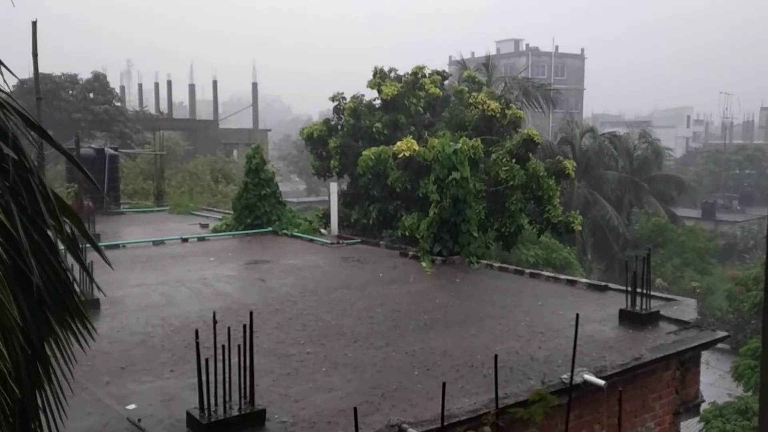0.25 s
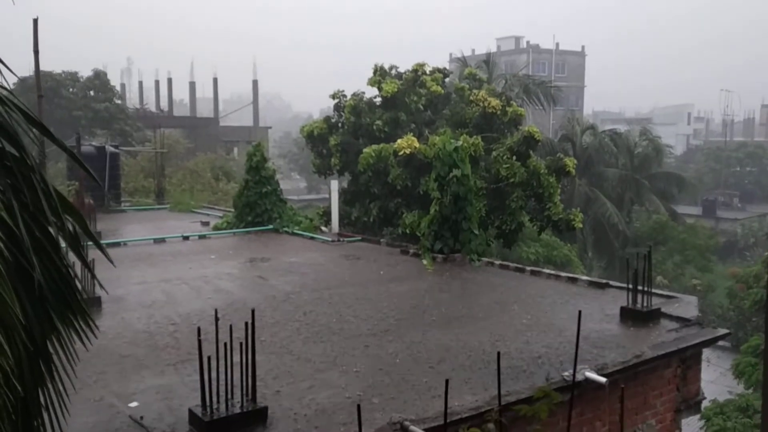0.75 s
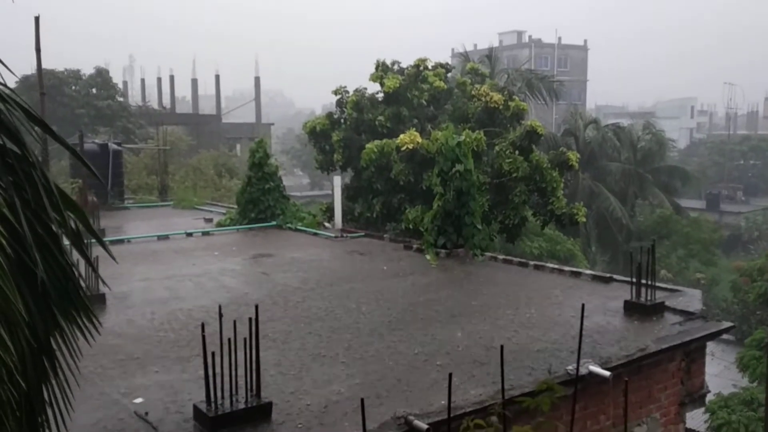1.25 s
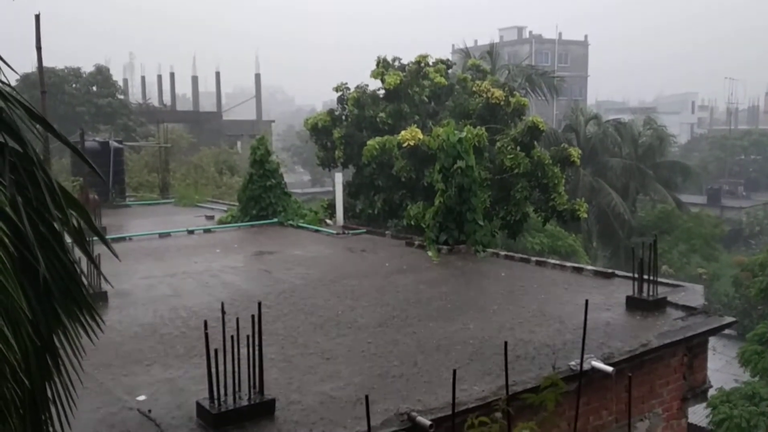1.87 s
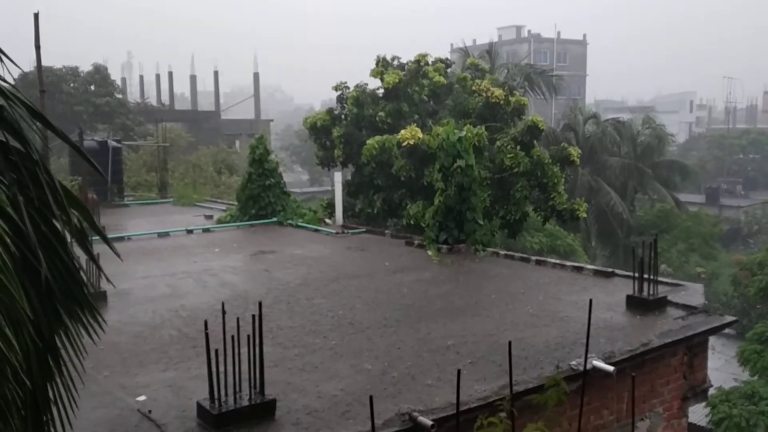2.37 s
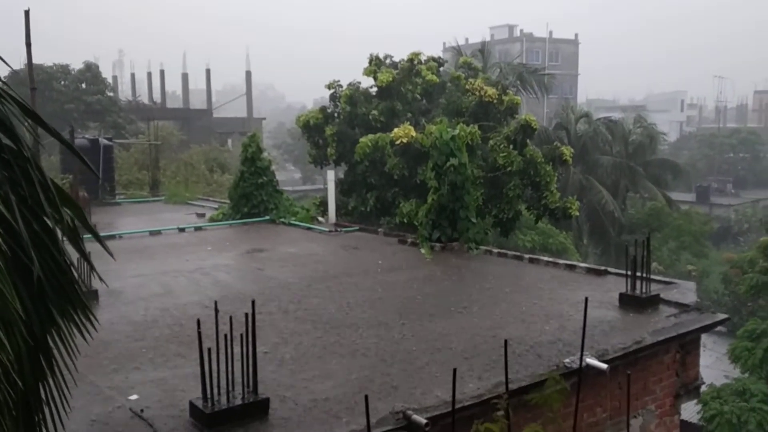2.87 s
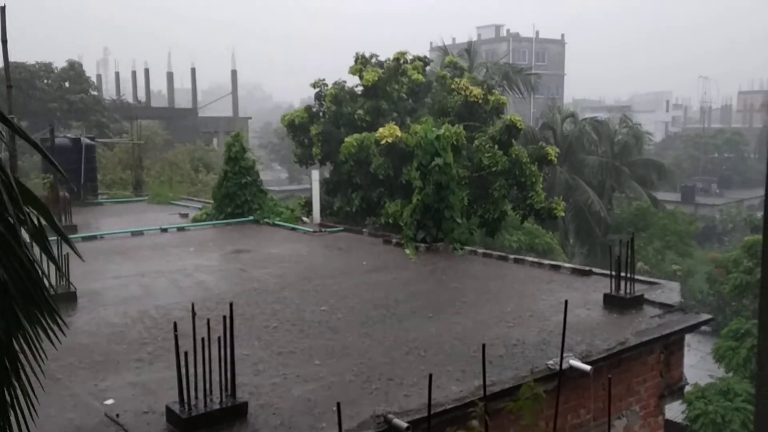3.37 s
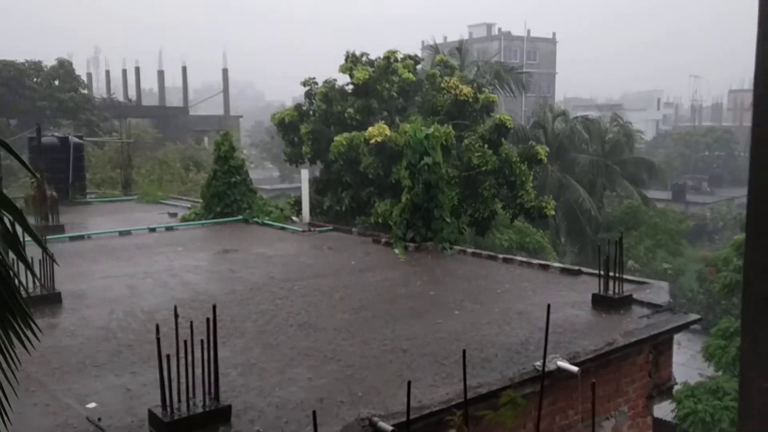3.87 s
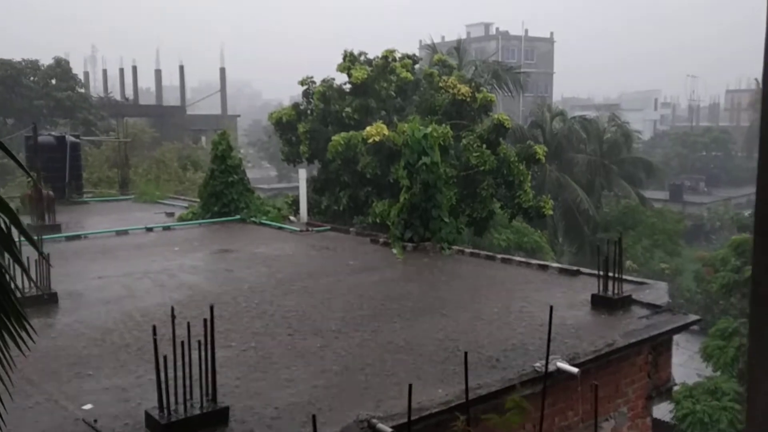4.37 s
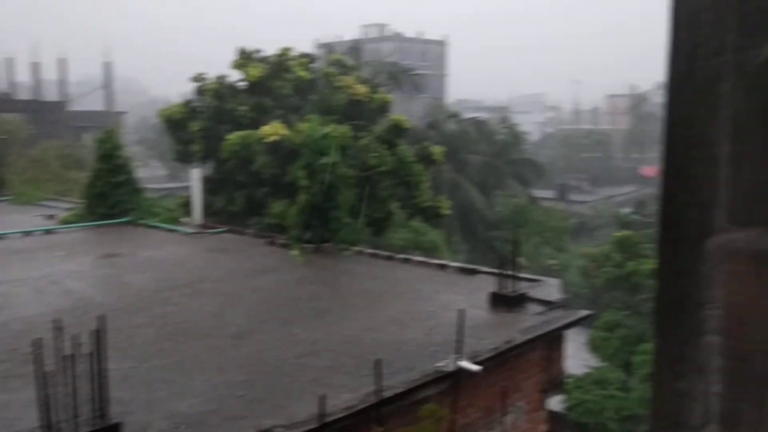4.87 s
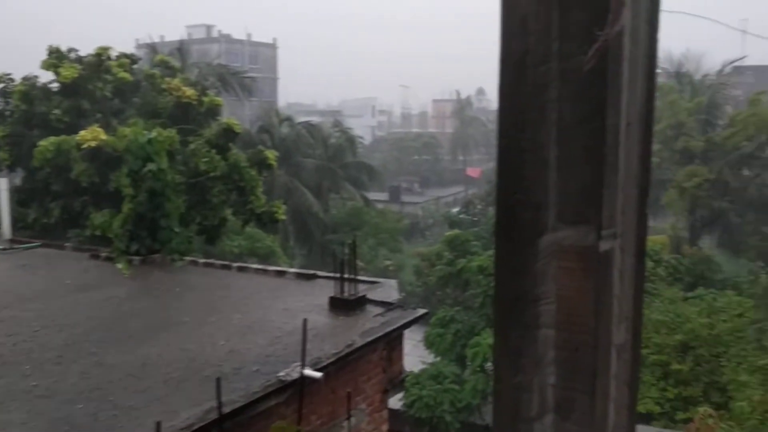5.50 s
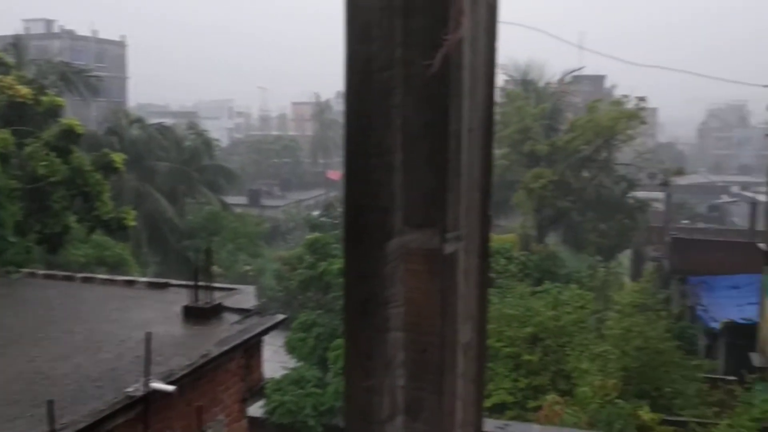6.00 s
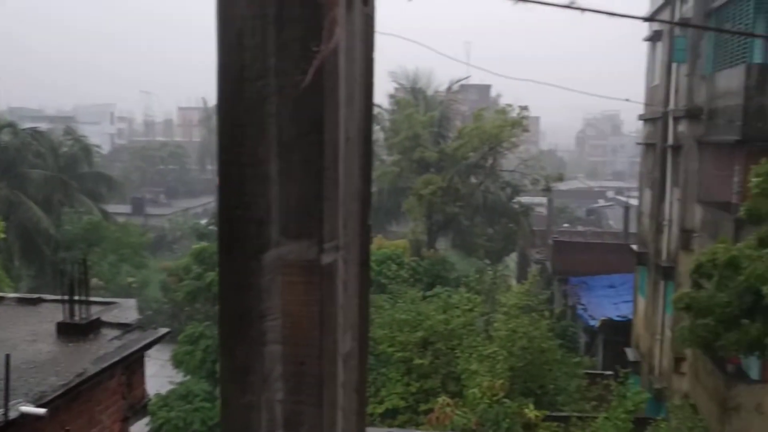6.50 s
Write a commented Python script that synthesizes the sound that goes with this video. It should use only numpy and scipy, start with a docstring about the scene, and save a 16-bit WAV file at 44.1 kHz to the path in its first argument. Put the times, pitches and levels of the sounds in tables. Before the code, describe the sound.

Heavy rain pours without pause on flat roofs and trees, heard on a hand-held stereo phone outdoors. A wide, dense roar surrounds the listener, its treble slightly patchy, overlaid with countless fine puddle blips and crisp ticks on wet concrete. Larger drops burst in brief spatters, notably near 1.0 and 1.4 s on the left, 3.0, 3.8, 4.6 on the right and 5.8 s. Until about 2 s there is no wind. At 2.1-2.5 s low gusts flutter and thump, mostly on the left; a lull follows, then scattered buffets from 3.0 to 4.6 s. From 5 s to the end near 6.6 s, soft bassy thuds around 100-200 Hz come thickly and independently on both sides. Between 1.2 and 3.8 s the left hiss grows more hollow and bright under a cupping hand; the right shifts slightly around 2.1-2.8 s.

```python
"""Heavy rain, hand-held phone

A diffuse roar of rain on flat roofs and trees, far off all round: shaped noise with faint treble patches.
Nearer, drops ring bubbles in puddles, tick on the wet roof and burst in splashes: decaying sine rings.
Two microphone ports colour the rain; a hand comes to cup the left one and the right one turns.
Wind buffets each port on its own: gusts of low noise and thumps that sag in pitch."""
import sys
import numpy as np
from scipy import signal
from scipy.fft import rfft, irfft, next_fast_len
from scipy.io import wavfile
from scipy.ndimage import uniform_filter1d, map_coordinates

SR = 44100
rng = np.random.default_rng(int(sys.argv[2]) if len(sys.argv) > 2 else 0)


def log_audio(samples):
    """Write samples as a 16-bit WAV file to the path given in sys.argv[1]."""
    # one column per channel
    frames = np.atleast_2d(samples).T
    # limit to full scale, then quantise
    limited = np.clip(frames, -1, 1)
    pcm = np.round(limited * 32767).astype(np.int16)
    wavfile.write(sys.argv[1], SR, pcm)


N = 297234  # samples

# Spectrum of the far roar: (frequency [Hz], relative density [dB per Hz])
ROAR_SPECTRUM = [(30, -32), (60, -21), (100, -9.5), (200, -6), (350, -2), (520, -2.5), (780, 1),
                 (1100, -0.5), (2000, 0), (3400, -6), (5500, -5), (7500, -4.5), (16000, -10.5)]
# Likeness of the roar at the two ports: (frequency [Hz], correlation [-1 to 1])
ROAR_LIKENESS = [(60, .8), (110, 0.95), (200, 0.97), (380, 0.83), (700, 0.56), (1050, 0.19), (1450, 0.24),
                 (2000, 0.034), (3000, 0.0062)]
# Phase by which the roar leads at the left port: (frequency [Hz], lead [rad])
ROAR_LEAD = [(100, .05), (400, .25), (700, .55), (900, 1), (1200, 2.3), (1600, 3.3)]
# Near drops by bubble pitch: (pitch [Hz], relative strength [dB])
DROP_STRENGTH = [(1500, -15), (3000, -2.5), (5000, 0), (7500, -1.5), (10000, -2.5), (15000, -5.5)]
# Big drops bursting: (time [s], level [dB], left minus right [dB], length [ms])
SPLASHES = [(.874, -17, 0, 12), (1.611, -15, 2, 8), (2.559, -17, 0, 8), (3.515, -16, -1, 8),
            (4.221, -20, 2, 8), (4.382, -20, 0, 8), (5.99, -21, 0, 8), (1.045, -8.5, 8, 11.3),
            (1.427, -12, 5, 22), (2.2644, -20, -1, 10), (2.825, -18, 18, 11), (3.005, -12, 5, 10),
            (3.817, -14, 9.5, 3.6), (3.83, -16, 13, 11), (4.564, -10, -6, 7), (5.831, -10, 6, 6),
            (6.5024, -13, -5, 9)]
# Colour of each port: (frequency [Hz], gain [dB])
LEFT_PORT_COLOUR = [(1200, 1.5), (2000, 0), (3400, 0.5), (5700, 0), (7500, 5.5), (8000, 2.5), (10000, 5.5),
                    (12000, 4.5), (13000, 4.5), (16000, 3)]
RIGHT_PORT_COLOUR = [(5500, 1.5), (6500, 3.5), (7400, 5.5), (7900, 3), (8400, 4.5), (9500, 2.5), (10300, 0),
                     (11800, 2.5), (13000, -0.5), (14100, -1), (14700, 1), (15200, 1.5)]
# Hollow of the palm at the left port: (centre [Hz], width [Hz], boost [dB])
PALM_HOLLOW = [(1270, 130, 2.5), (2220, 1400, 7)]
# Gaps at the fingers, left port: (centre [Hz], width [Hz], boost [dB])
FINGER_GAPS = [(4510, 690, 4.5), (5500, 610, 2), (7040, 700, 4), (7740, 400, 1.5), (8270, 790, 6.5),
               (9600, 550, 1), (10750, 810, 3.5), (12500, 2100, 4.5)]
# Right port turned: (centre [Hz], width [Hz], boost, or cut if negative [dB])
TURNED_PORT = [(1800, 1500, 1.5), (7340, 900, 1.5), (8850, 520, 2), (13000, 1200, -2), (14500, 900, 0)]
# Body of the wind on a port: (frequency [Hz], relative density [dB per Hz])
BUFFET_SPECTRUM = [(20, -30), (40, -22), (65, -4.5), (105, 0.5), (170, -8), (260, -18), (400, -16.5),
                   (700, -53), (2000, -90)]
# Sharp edge of strong eddies: (frequency [Hz], relative density [dB per Hz])
EDGE_SPECTRUM = [(60, -42), (150, -17), (240, 5), (360, -10), (600, -17), (2000, -90)]
# Gusts: (start [s], time before release [s], force [dB], port ["L" or "R"])
GUST_EVENTS = [(2.111, 0.074, -37.5, "L"), (2.226, 0.069, -30.5, "L"), (2.26, .06, -37, "R"),
               (2.332, 0.055, -40, "L"), (2.426, 0.09, -44, "R"), (2.47, .04, -37, "L"),
               (2.66, 0.064, -39.5, "L"), (3.038, 0.43, -45, "L"), (3.08, 0.03, -40, "R"),
               (3.196, 0.037, -35, "R"), (3.288, 0.15, -38, "R"), (3.428, .1, -36, "R"),
               (3.454, 0.68, -40, "L"), (3.57, 0.064, -35, "R"), (3.747, 0.96, -43.5, "R"),
               (4.263, 0.09, -42, "L"), (4.43, 0.077, -37.5, "L"), (4.73, 0.076, -41, "R"),
               (4.825, 0.25, -40, "L"), (5.083, 0.52, -37, "L"), (5.196, 0.05, -41, "R"),
               (5.34, 0.44, -36.5, "R"), (5.67, .11, -38, "L"), (5.875, 0.028, -37, "R"),
               (5.96, 0.033, -35, "R"), (6.15, 0.05, -40, "R"), (6.224, 0.11, -34, "R"),
               (6.19, 0.17, -32, "L"), (6.413, 0.085, -32.5, "R"), (6.396, 0.29, -33.5, "L"),
               (6.56, .15, -45, "R")]
# Strong eddies hitting a port:
# (centre time [s], swing level [dB], centre pitch [Hz], width [ms], port [0 left, 1 right])
EDDY_THUMPS = [(2.153, -19, 167, 13, 0), (2.196, -22, 120, 11, 0), (2.238, -23, 160.5, 7.9, 0),
               (2.261, -32, 181, 12, 0), (2.299, -23, 150, 7.2, 0), (3.227, -27, 100, 23, 1),
               (3.444, -28, 168, 13, 1), (3.479, -31, 148, 21, 1), (3.515, -20, 140, 9, 1),
               (3.579, -31, 170, 9.8, 0), (3.654, -22, 159.7, 7.8, 0), (3.734, -28, 169.3, 8, 0),
               (3.83, -26, 150, 9, 0), (3.865, -26, 150.5, 8, 0), (3.894, -27, 161, 12, 0),
               (4.292, -26, 149, 7, 0), (4.326, -24, 188.5, 11, 0), (4.455, -26, 140, 10, 0),
               (4.566, -27, 199, 9.4, 1), (4.983, -25, 198.7, 6.3, 0), (5.014, -22.5, 127.7, 11, 0),
               (5.191, -28, 120, 15, 0), (5.216, -25, 140, 9.8, 1), (5.243, -30, 121, 21, 0),
               (5.291, -24, 160, 17, 0), (5.326, -23, 162, 8.7, 1), (5.353, -19, 139.7, 11.5, 0),
               (5.359, -21, 130.7, 9, 1), (5.396, -27, 200, 10.6, 1), (5.404, -31, 170, 13, 0),
               (5.477, -23, 161, 9.3, 1), (5.485, -27, 148.6, 6.7, 0), (5.509, -28, 111, 18, 0),
               (5.548, -17, 149.7, 15, 1), (5.551, -25, 151.3, 9, 0), (5.586, -28, 170, 8, 1),
               (5.611, -21, 130, 17, 1), (5.647, -23, 159.3, 9.5, 1), (5.68, -26, 119.7, 15, 0),
               (5.707, -22, 110.4, 10, 1), (5.762, -25, 112, 12, 1), (5.902, -23, 160, 11, 1),
               (5.983, -32, 222.5, 13, 1), (6.169, -23, 111.6, 18, 1), (6.21, -23, 131, 7.4, 0),
               (6.257, -32, 119.5, 21, 0), (6.26, -23, 170, 15, 1), (6.298, -22, 221, 8.6, 1),
               (6.313, -24, 152, 10, 0), (6.325, -29, 151, 17, 1), (6.343, -25, 139, 13.5, 0),
               (6.434, -33, 150, 21, 0), (6.435, -23, 171, 8.2, 1), (6.464, -27, 150.5, 6.5, 0),
               (6.464, -25, 190.6, 9.4, 1), (6.492, -21, 129, 23, 0), (6.515, -30, 150.4, 9.5, 1),
               (6.55, -27, 140, 8.5, 0), (6.59, -26, 138.5, 9, 0), (6.638, -21, 129.5, 10, 0)]

ROAR_DB, DROPS_DB, PATTER_DB = -26, -31.5, -46  # rms levels ahead of the port colour
LEFT_LEAD_S = .0003  # lead of the left port for a drop equally loud at both
PALM_CLOSES, FINGERS_CLOSE, PORT_TURNS = (1.2, 3.84), (2.4, 3.75), (2.1, 2.8)  # (start [s], end [s])
GUST_ATTACK_S, GUST_RELEASE_S = 0.0082, 0.045
BREEZE_FROM_S, BREEZE_DB = 1.9, -51.5  # still air at first, then a light breeze under the gusts
SAG_OCTAVES = .3  # fall of a thump's pitch over half its width
FRONT_DB = -7  # sharp front of a thump, relative to its swing
TOP_HZ = 15750  # band limit of the phone


def roar():
    """Countless far drops blend into a diffuse noise with faint patches, mostly in the treble."""
    hz, _, grains = signal.stft(rng.standard_normal((2, N)), SR, nperseg=1024)
    # the same patches reach both ports
    field = rng.standard_normal(grains.shape[1:])
    field = uniform_filter1d(field, size=2, axis=0)
    field = uniform_filter1d(field, size=3, axis=1)
    depth_db = along([(1000, 0.052), (3000, 2.6), (6000, 3.54), (9000, 2.74), (13000, 2.5)], hz)[:, None]
    patch_db = depth_db * field / field.std()
    # sheets of rain pass
    frame_at = np.minimum(512 * np.arange(grains.shape[-1]), N - 1)
    swell_db = along([(3000, 0.04), (9000, 0.79)], hz)[:, None] * wobble(9)[frame_at]
    pair = signal.istft(grains * amp(patch_db + swell_db), SR, nperseg=1024)[1][:, :N]

    def mid_side_shape(f):
        # the share of mid to side sets how alike the ports are
        angle = np.arccos(np.clip(along(ROAR_LIKENESS, f), -1, 1)) / 2
        return amp(along(ROAR_SPECTRUM, f)) * [np.cos(angle), np.sin(angle)]

    def left_lead(f):
        return np.exp(1j * np.outer([.5, -.5], along(ROAR_LEAD, f)))

    mid, side = filtered(pair, mid_side_shape)
    stereo = np.array([mid + side, mid - side])
    return amp(ROAR_DB) * unit(filtered(stereo, left_lead))


def drops(count=8000):
    """Near drops trap bubbles in the puddles: many small, few large, falling in clumps."""
    when, big, pitch, pan = rng.random((count, 4)).T
    hz = 2000 + 13500 * pitch
    size = amp(along(DROP_STRENGTH, hz) - 0.58 * np.log(1 - big))
    cycles = 0.027 * hz  # every bubble lives equally long
    clumps = amp(.7 * wobble(10))
    rings = ticks(when * N / SR, hz, cycles, size, 16 * (pan - .5))
    return amp(DROPS_DB) * clumps * unit(rings)


def patter(count=2500):
    """Drops striking the wet roof close by: crisp ticks of a few cycles."""
    when, big, pitch, pan = rng.random((count, 4)).T
    size = amp(-2.2 * np.log(1 - big))
    hz = 1500 * 2 ** (3.2 * pitch)
    return amp(PATTER_DB) * unit(ticks(when * N / SR, hz, 2.7, size, 16 * (pan - .5)))


def splashes(count=70):
    """A big drop bursts into a spatter of droplets that thins out over its length."""
    start, db, pan_db, ms = np.transpose(SPLASHES)[..., None]
    later, strength, pitch = np.moveaxis(rng.random((len(SPLASHES), count, 3)), -1, 0)
    size = amp(db - 8.9 * later) * strength
    when = start + ms / 1000 * later ** 1.7
    droplets = np.broadcast_arrays(when, 5500 + 9500 * pitch, 4, size, pan_db)  # 4 cycles each
    return ticks(*(column.ravel() for column in droplets))


def ticks(when, hz, cycles, size, pan_db):
    """Each drop is a fading sine; the left port leads, more so for drops louder on the left."""
    t = np.arange(1600) / SR
    fade = t * (hz / cycles)[:, None]
    envelope = fade * np.exp(1 - fade * 3)
    ring = size[:, None] * envelope * np.sin(2 * np.pi * hz[:, None] * t)
    lead = LEFT_LEAD_S + .00012 * pan_db / 10
    out = []
    for side in (.5, -.5):  # left, right
        first = ((when - side * lead) * SR).astype(int)[:, None]
        at = np.clip(first + np.arange(len(t)), 0, N)
        heard = ring * amp(side * pan_db)[:, None]
        out.append(np.bincount(at.ravel(), heard.ravel(), N + 1)[:N])
    return np.array(out)


def ports(x):
    """Each port colours the air sound; resonances grow as the hand closes and the right port turns."""
    hz, t, z = signal.stft(x, SR, nperseg=512)
    palm = move(PALM_CLOSES, t) * bumps(PALM_HOLLOW, hz)
    fingers = move(FINGERS_CLOSE, t) * bumps(FINGER_GAPS, hz)
    left_db = along(LEFT_PORT_COLOUR, hz)[:, None] + palm + fingers
    right_db = along(RIGHT_PORT_COLOUR, hz)[:, None] + move(PORT_TURNS, t) * bumps(TURNED_PORT, hz)
    return signal.istft(z * amp([left_db, right_db]), SR, nperseg=512)[1][:, :N]


def wind():
    """Eddies flutter on each port in lumps, unrelated from side to side; strong ones reach higher."""
    force = gusts()
    lumps = amp(1.2 * np.array([wobble(30), wobble(30)]))
    air = lumps * rng.standard_normal((2, N))
    body = unit(filtered(air, lambda f: amp(along(BUFFET_SPECTRUM, f))))
    edge = unit(filtered(air, lambda f: amp(along(EDGE_SPECTRUM, f))))
    edge_share = amp(13.5) * force ** 0.81  # grows with the force
    flutter = force * (body + edge_share * edge) + thumps()
    # the capsule sheds the deepest pressure, below about 45 Hz
    return filtered(flutter, lambda f: 1 / np.sqrt(1 + (45 / (f + 1)) ** 4))


def gusts():
    """Force on each port: every gust rises, holds and dies away over the breeze."""
    t = np.arange(N) / SR
    breeze = amp(2 * BREEZE_DB) * move((BREEZE_FROM_S, BREEZE_FROM_S + 0.096), t)
    power = np.tile(breeze, (2, 1))
    for start, length, db, port in GUST_EVENTS:
        rise = np.clip((t - start) / GUST_ATTACK_S, 0, 1)
        release = np.exp(-np.maximum(t - start - length, 0) / GUST_RELEASE_S)
        power["LR".index(port)] += (amp(db) * rise * release) ** 2
    return np.sqrt(power)


def thumps():
    """A strong eddy pushes the capsule in and lets it swing back, a cycle or two, sagging in pitch."""
    out = np.zeros((2, N + SR))
    offset = np.arange(-2000, 2000)
    t = offset / SR
    phases = rng.normal(.25, .08, len(EDDY_THUMPS))  # cycles
    for (centre, db, hz, ms, port), phase in zip(EDDY_THUMPS, phases):
        u = t / (ms / 1000)
        bell = np.exp(-(u / 0.5) ** 2)
        pitch = hz * 2 ** np.clip(-SAG_OCTAVES * 2 * u, -2, 2)
        cycles = np.cumsum(pitch) / SR
        cycles = cycles - cycles[len(t) // 2]
        swing = bell * np.cos(2 * np.pi * (cycles + phase))
        # an octave up and half as long
        front = amp(FRONT_DB) * bell ** 4 * np.cos(4 * np.pi * (cycles + phase))
        out[round(port), round(centre * SR) + offset] += amp(db) * (swing + front)
    return out[:, :N]


def amp(db):
    """dB to gain."""
    return 10 ** (np.asarray(db) / 20)


def unit(x):
    """Each channel at rms 1."""
    return x / np.sqrt(np.mean(x ** 2, axis=-1, keepdims=True) + 1e-20)


def along(points, hz):
    """Interpolate (frequency [Hz], value) points on a log frequency axis."""
    f, v = np.transpose(points)
    return np.interp(np.log(hz + 1), np.log(f + 1), v)


def wobble(rate):
    """A smooth random curve, rate knots a second."""
    knots = rng.standard_normal(int(N * rate / SR) + 4)
    return map_coordinates(knots, [np.arange(N) * rate / SR])


def filtered(x, response):
    """x times a response of frequency."""
    m = next_fast_len(N + 8192)  # padded so that tails do not wrap round
    return irfft(rfft(x, m) * response(np.fft.rfftfreq(m, 1 / SR)), m)[..., :N]


def bumps(modes, hz):
    """Summed gain in dB of a set of broad resonances."""
    return sum(db / (1 + (2 * (hz - c) / w) ** 2) ** 1.43 for c, w, db in modes)[:, None]


def move(span, t):
    """A smooth step from 0 to 1 over (start [s], end [s])."""
    u = np.clip((t - span[0]) / (span[1] - span[0]), 0, 1)
    return (1 - np.cos(np.pi * u)) / 2


def scene():
    """Rain through the ports, wind on them."""
    rain = roar() + drops() + patter() + splashes()
    return ports(rain) + wind()


def record(dry):
    """The phone keeps nothing above its band limit."""
    return filtered(dry, lambda hz: hz < TOP_HZ)


dry = scene()
out = record(dry)
log_audio(out)
```